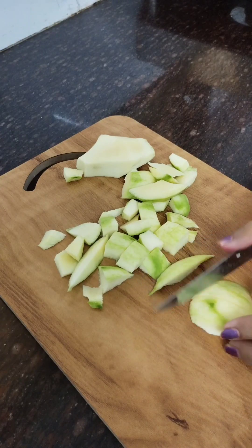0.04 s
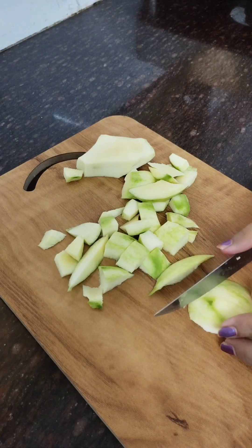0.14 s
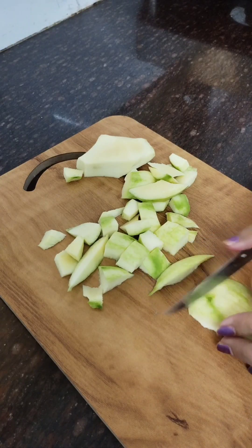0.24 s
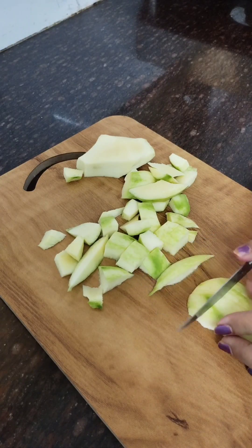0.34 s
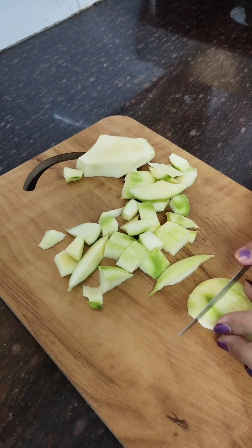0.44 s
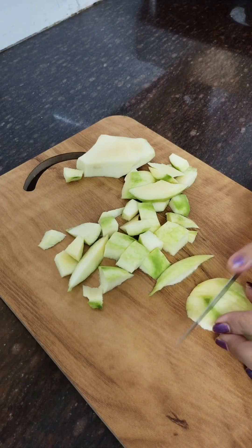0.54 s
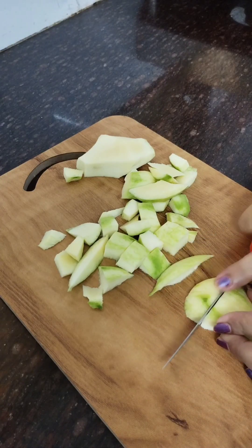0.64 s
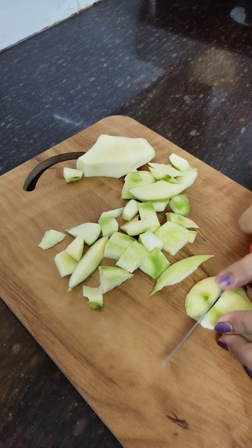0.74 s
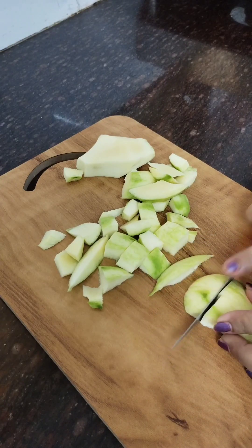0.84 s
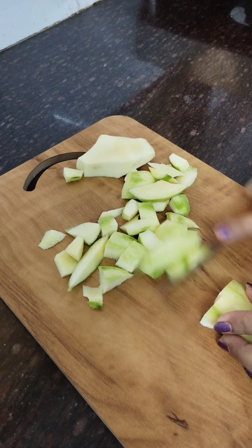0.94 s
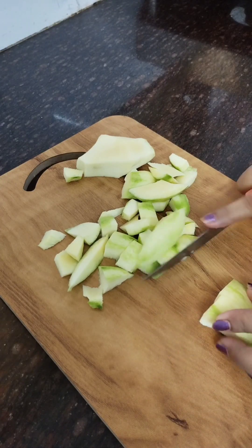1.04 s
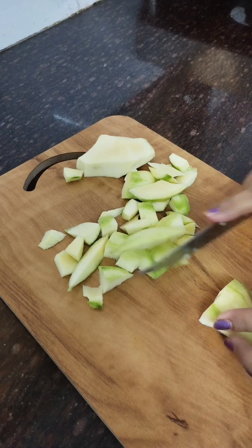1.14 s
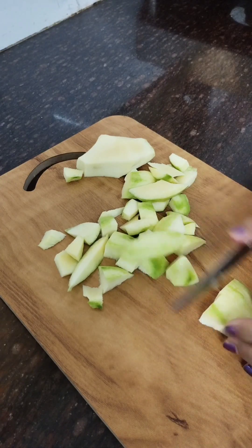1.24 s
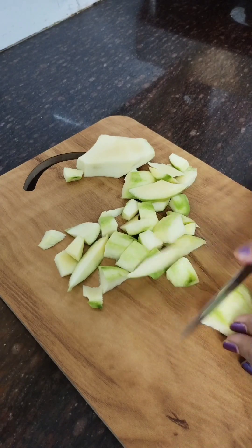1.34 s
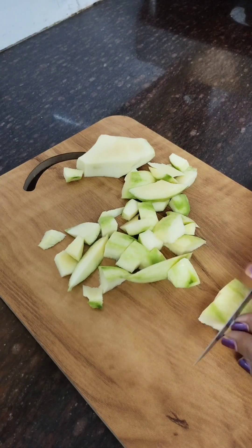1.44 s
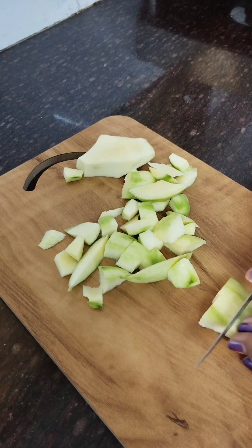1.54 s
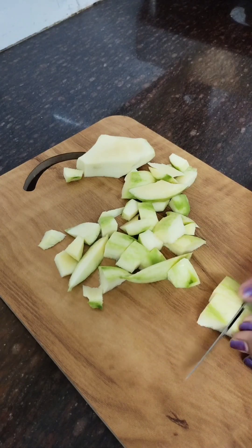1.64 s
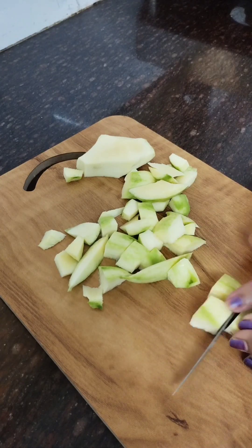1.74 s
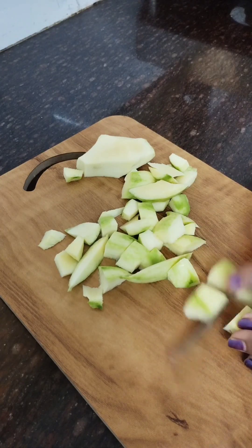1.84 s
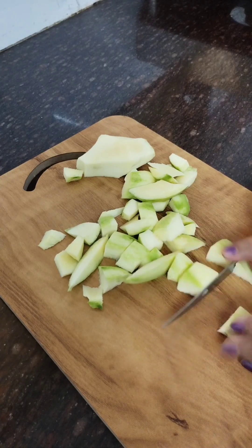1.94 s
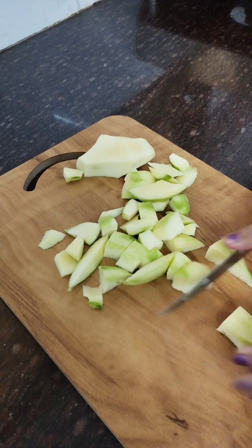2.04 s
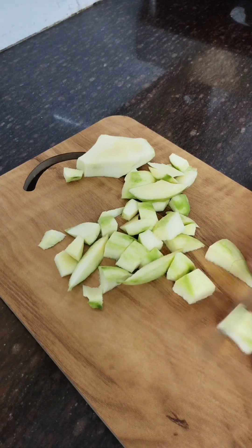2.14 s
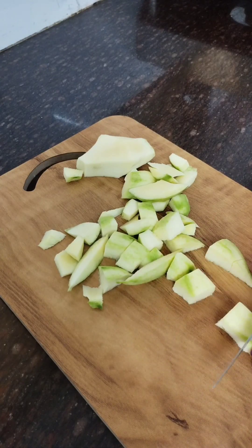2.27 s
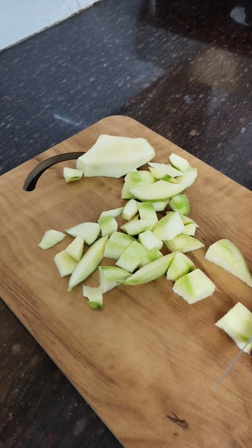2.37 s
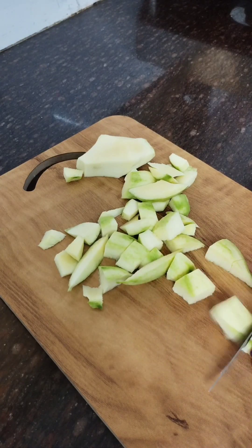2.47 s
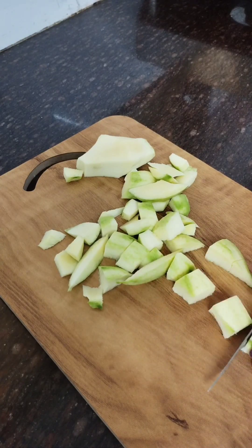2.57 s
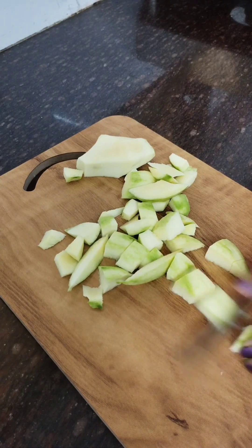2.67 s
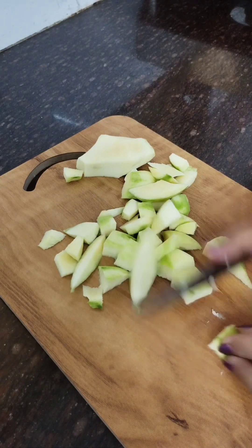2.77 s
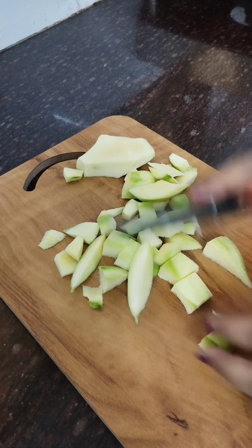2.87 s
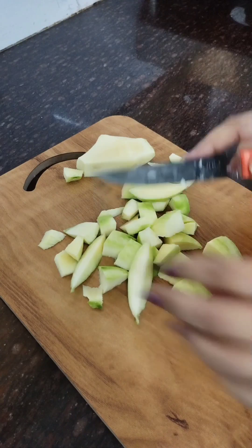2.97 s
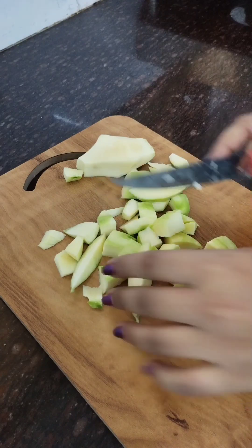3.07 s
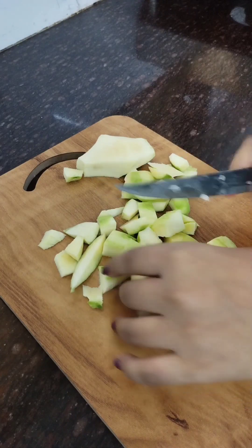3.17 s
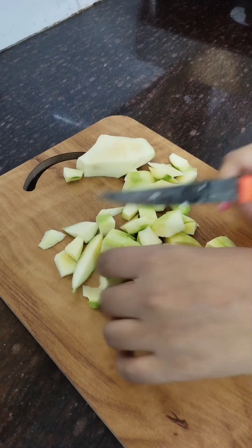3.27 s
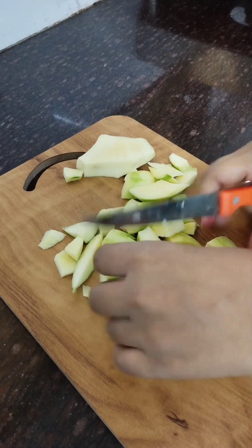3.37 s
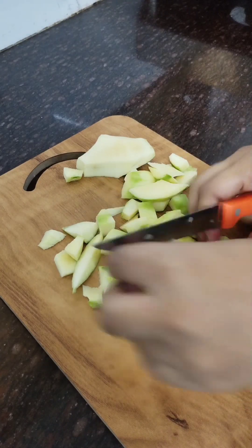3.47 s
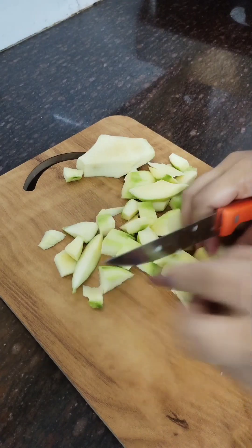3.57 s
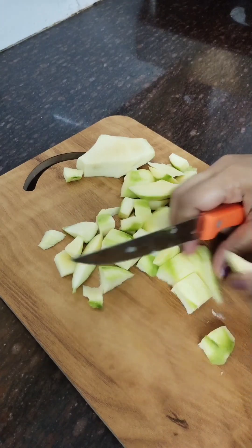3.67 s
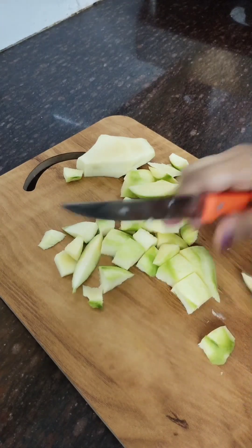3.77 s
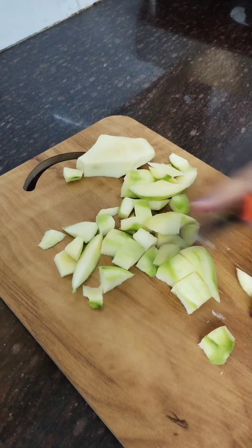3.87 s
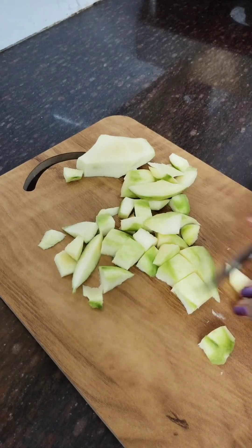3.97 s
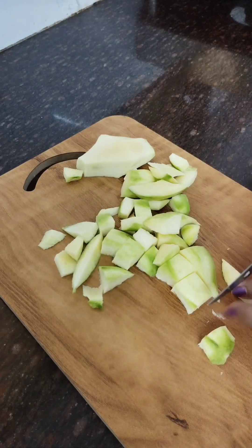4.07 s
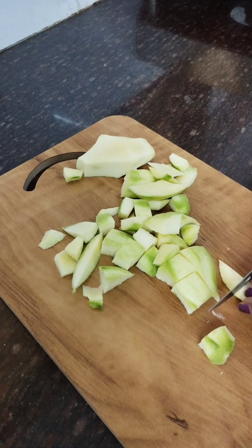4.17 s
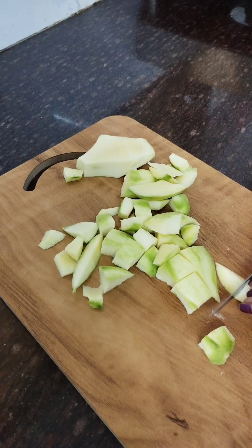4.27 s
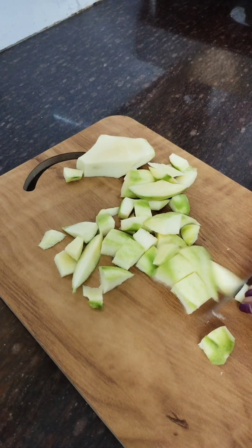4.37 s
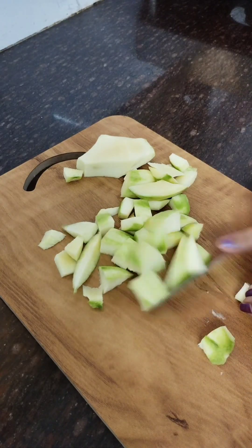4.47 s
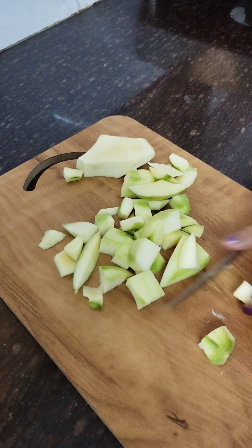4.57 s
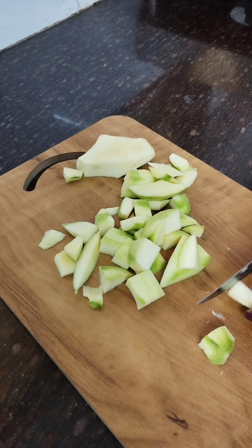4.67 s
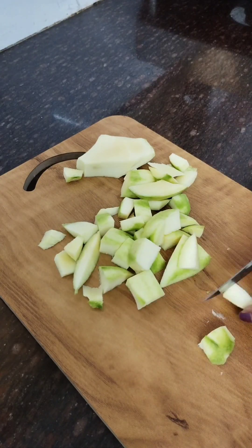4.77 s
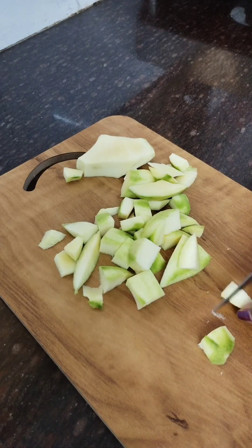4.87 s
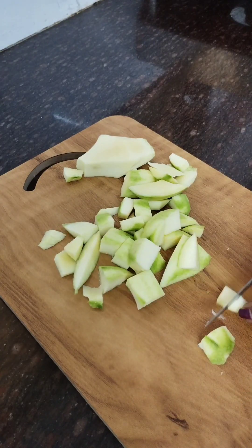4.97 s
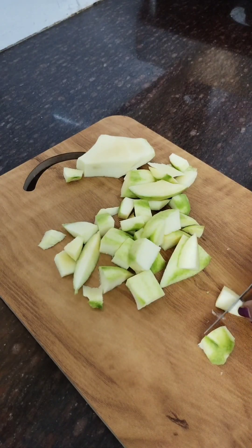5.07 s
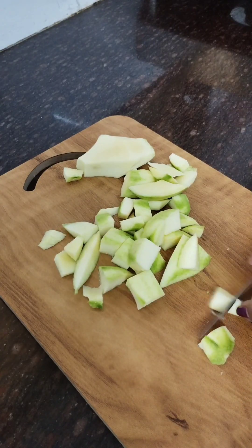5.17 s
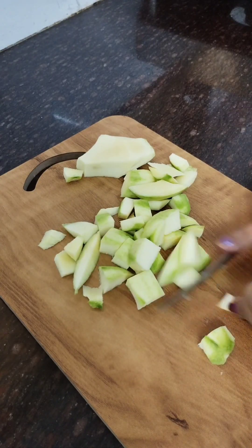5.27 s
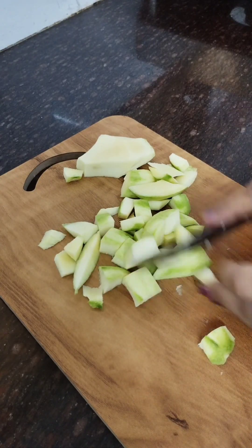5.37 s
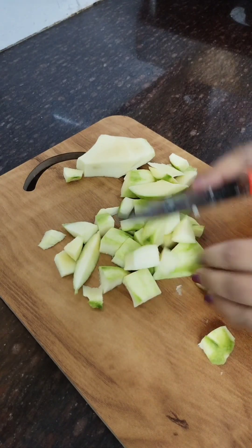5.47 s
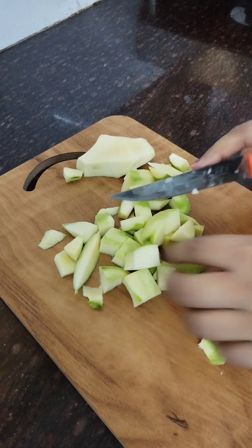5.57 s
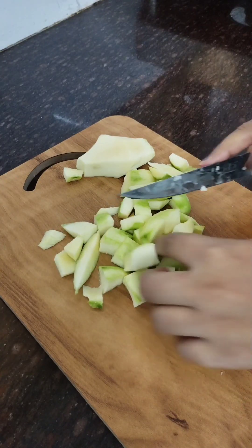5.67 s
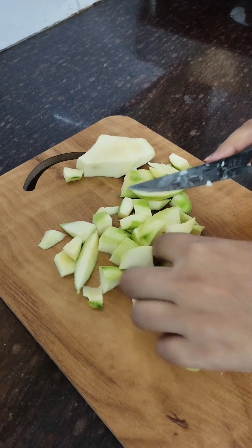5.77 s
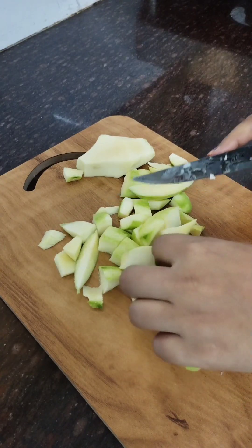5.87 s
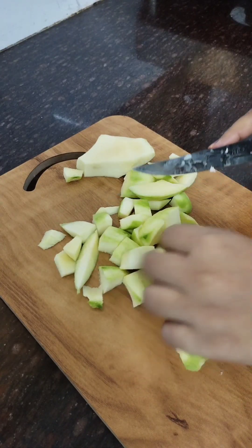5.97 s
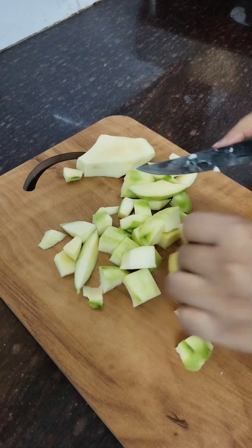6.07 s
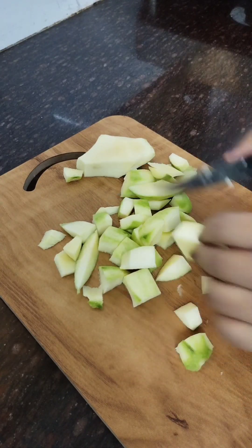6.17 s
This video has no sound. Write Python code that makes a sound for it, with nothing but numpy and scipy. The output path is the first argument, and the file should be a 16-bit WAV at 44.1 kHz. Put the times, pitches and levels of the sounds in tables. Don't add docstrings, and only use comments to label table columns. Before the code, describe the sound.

Close to a small microphone in a hard, lively kitchen, a knife cuts crisp fruit on a wooden board. A crackly slice ends in a light knock, then a short scrape; two much harder, overloaded knocks follow, each with a dragging blade. Later come wet snaps, low bumps, gritty scraping and one light ringing knock. Hands rustle softly; a vehicle and bird are faint at the start.

```python
import sys
import numpy as np
from scipy import signal
from scipy.fft import rfft, irfft, next_fast_len
from scipy.io import wavfile
from scipy.ndimage import uniform_filter1d

SR = 44100
rng = np.random.default_rng(int(sys.argv[2]) if len(sys.argv) > 2 else 0)


def volts(x):
    e = np.asarray(x, float) / 20
    return 10 ** e


def transcribe(u):
    v = np.clip(np.atleast_2d(u).T, -1, 1)
    q = np.round(v * 32767).astype(np.int16)
    wavfile.write(sys.argv[1], SR, q)


N = 274280


def rms_one(x):
    return x / np.sqrt(np.mean(x ** 2) + 1e-20)


def white():
    return rng.standard_normal(N)


def band_pass(x, low_hz, high_hz):
    return signal.sosfilt(signal.butter(2, [low_hz, high_hz], "band", fs=SR, output="sos"), x)


def line(start_s, length_s, first, last):
    return np.interp(np.arange(N) / SR, [start_s, start_s + length_s], [first, last])


def while_on(start_s, end_s):
    t = np.arange(N) / SR
    return uniform_filter1d(1. * (t > start_s) * (t < end_s), size=133)


def at_hz(points, hz):
    points_hz, values = np.transpose(points)
    return np.interp(np.log(hz + 1), np.log(points_hz), values)


def coloured(x, spectrum):
    size = next_fast_len(N)
    gain = volts(at_hz(spectrum, np.fft.rfftfreq(size, 1 / SR)))
    return rms_one(irfft(rfft(x, size) * gain, size)[:N])


def drift(rate_hz):
    r = np.exp(-2 * np.pi * rate_hz / SR)
    wander = signal.lfilter([1], [1, -2 * r, r * r], rng.standard_normal(N + SR))
    return rms_one(wander[SR:])


def grains(per_s, spread_db):
    sizes = volts(spread_db * np.minimum(rng.exponential(1, N), 5)) * rng.choice([-1, 1], N)
    return rms_one(sizes * (rng.random(N) < per_s / SR))


def resonate(x, hz, width_hz):
    r = np.exp(-np.pi * width_hz / SR)
    poles = [1, -2 * r * np.cos(2 * np.pi * hz / SR), r * r]
    return signal.lfilter([(1 - r * r) / 2, 0, (r * r - 1) / 2], poles, x + 1e-18)


def modes(table, drive):
    return sum((-1) ** k * volts(db) * resonate(drive, hz, width_hz)
               for k, (hz, width_hz, db) in enumerate(table))


def bursts(rows, length_s, click):
    low, high, t = np.zeros(N), np.zeros(N), np.arange(2000) / SR
    for s, db, bright_db in rows:
        chatter = rng.standard_normal(len(t)) * np.exp(-(t / length_s) ** 2)
        chatter[0] = -click
        i = round(s * SR)
        low[i:i + len(t)] += volts(db - bright_db) * chatter
        high[i:i + len(t)] += volts(db + bright_db) * chatter
    return np.array([low, high])


def swell(s, db, rise_s, hold_s, fall_s):
    t = np.arange(0, N + 44, 44) / SR
    down = np.maximum((s - t) / rise_s, (t - s - hold_s) / fall_s).clip(0)
    return np.interp(np.arange(N) / SR, t, volts(db - 40 * down))


def moves(rows, rest_db):
    return volts(rest_db) + sum(swell(s, db, fade_s, 0, fade_s) for s, db, fade_s in rows)


# (time [s], blow [dB], microphone sag [0-3], edge snap [dB], blade ring [dB])
KNOCKS = [
    (0.6347, 19, 0.038, 16.5, -12),
    (1.666, 28, 1.46, 20, 9.5),
    (2.5166, 29.5, 1.3, 24, 9),
    (5.144, 18.5, 0.015, 12, 30),
]
# (frequency [Hz], width [Hz], level [dB])
BLADE_LOW = [(813, 160, -13), (1353, 120, -0.5), (2130, 600, -2), (2544, 396, 2)]
BLADE_HIGH = [(3150, 340, -4), (4280, 200, -9.5), (5250, 380, -7.5), (6480, 1200, -15), (8320, 810, -10),
              (10730, 260, -22.5), (14000, 3000, -37)]


def knocks():
    snap, steel = np.zeros(N), np.zeros(N)
    for s, *_, snap_db, blade_db in KNOCKS:
        snap[round(s * SR)] = -volts(snap_db)
        steel[round(s * SR)] = -volts(blade_db)
    blade = modes(BLADE_LOW[2:], steel) + modes(BLADE_HIGH, steel)
    bright_db = 1
    rows = [(s, db, bright_db) for s, db, *_ in KNOCKS]
    hit = board(*bursts(rows, 2e-5, click=0.89))
    blow = hit + resonate(snap, 6200, 4800) - blade
    rattle = volts(-20) * board(*bursts(rows, 0.0031, click=0))
    return blow, rattle


# (frequency [Hz], width [Hz], level [dB])
BOARD_LOW = [(833, 200, -23.5), (1246, 270, 0.5), (2030, 510, 1), (2422, 250, 7.5), (3580, 1500, 1.5)]
BOARD_HIGH = [(4440, 1200, 4), (5520, 900, -3), (6210, 910, 2.5), (8500, 900, -7), (10250, 2200, -17.5),
              (14520, 2900, -37)]


def board(low_drive, high_drive):
    out = modes(BOARD_LOW, low_drive) - modes(BOARD_HIGH, high_drive)
    out = out - 0.39 * resonate(out, 980, 380)
    return out - 0.71 * resonate(out, 2950, 630)


# (full pressure [s], level [dB], rise [s], hold [s], brightness [dB])
SCRAPES = [(.926, -20, 0.02, 0.06, 0.5), (.99, -30.5, 0.076, 0.048, -5), (4.44, -36.5, 0.059, .02, -6),
           (4.475, -20, 0.087, 0.011, 2), (4.506, -16.5, 0.051, 0.0052, 2), (4.56, -41.5, 0.06, .02, -2),
           (4.6, -33.5, 0.067, 0.014, 0), (5.253, -21.5, 0.046, 0.002, 3.5), (5.28, -22, 0.082, 0.016, -2),
           (5.33, -33.5, .05, 0.016, -1.5)]
DRAGS = [(1.792, -28, 0.011, .025, -4), (1.875, -34, 0.097, 0.008, -2), (1.925, -30.5, 0.11, 0.022, -8),
         (2.655, -27.5, .01, 0.021, -1.5), (2.72, -26, 0.052, 0.0194, -2.5),
         (2.79, -36.5, 0.033, 0.0088, -6)]


def scrapes():
    stutter = volts(1.8 * drift(110))
    clicks = stutter * np.array([grains(9000, 3.7), grains(9000, 2.5)])
    push = pressure(SCRAPES)
    low, high = push * clicks
    hiss = volts(-33) * resonate(push[1] * clicks[0], 12000, 5000)
    edge = modes(BLADE_LOW, low) + modes(BLADE_HIGH, high) + hiss
    dull = signal.butter(1, 9000, fs=SR, output="sos")
    drag = signal.sosfilt(dull, board(*(pressure(DRAGS) * clicks)))
    return volts(9.5) * edge + volts(5) * drag


def pressure(rows):
    fall_s = 0.074
    return sum(volts([[-bright_db], [bright_db]]) * swell(s, db, rise_s, hold_s, fall_s)
               for s, db, rise_s, hold_s, bright_db in rows)


# (time [s], peak [dB], brightness [dB])
CRACKS = [(0.3436, -37, 4.5), (0.53, -33, 4), (0.546, -36, 0), (0.5915, -20.5, 2), (0.6047, -18, -1),
          (0.617, -15, 2), (1.6345, -25.5, 1.5), (2.4723, -25.5, 1), (2.8744, -36, 4), (3.235, -38, 0),
          (3.336, -45.5, 5), (3.6274, -39, 2.5), (4.086, -38.5, 3.5), (4.1975, -50.5, 19),
          (4.3132, -21.5, 3), (4.3444, -37, -1), (5.0664, -27.5, 3.5), (5.1015, -26, 2.5),
          (5.854, -47.5, 2.5), (5.8994, -47, 6.5)]
TICKS = [(0.361, -34.5, 5), (0.411, -39, 4), (0.5925, -14, 1), (0.6095, -22, 0), (0.6218, -20, -1),
         (0.883, -36.5, 13), (0.8995, -34.5, 13), (2.057, -37, 2), (2.1393, -42.5, 0.5), (2.1897, -40, 2.5),
         (3.703, -44, 8), (3.8018, -35.5, 3), (4.3799, -21.5, 2.5), (4.4116, -18, 0.5), (4.4205, -23, 4),
         (4.432, -23, -4.5), (4.476, -15, -10), (4.485, -11.5, -12), (5.2525, -17, -5), (5.872, -46, 2.0)]
# (frequency [Hz], width [Hz], level [dB])
SNAP = [(1250, 1400, -0.5), (3200, 2500, -0.5), (5650, 6700, -5), (9400, 3500, -2.5), (13300, 6100, -13.5)]


def cracks():
    low, high = bursts(CRACKS, 0.013, click=2.8) + bursts(TICKS, 0.0041, click=2.8)
    return volts(-4) * (modes(SNAP[:2], low) + modes(SNAP[2:], high))


# (start [s], length [s], start level [dB], change [dB])
SLICES = [(0.592, 0.034, -29.5, 4), (1.635, .025, -23.5, -7), (1.66, .0045, -31, 12.5),
          (2.47, .031, -35.5, -29), (2.511, 0.0092, -29.5, 24), (4.261, .04, -53.5, 1.5),
          (4.34, 0.094, -56.5, 2), (5.137, 0.0082, -55.5, 42.5)]
# (frequency [Hz], density [dB])
FLESH = [(290, -43), (500, -8.5), (1330, -3.5), (2260, -12), (2810, -13.5), (7060, -6), (8790, -3.5),
         (15300, -28.5), (16500, -39)]


def slices():
    level = sum(volts(line(s, length_s, db, db + change_db)) * while_on(s, s + length_s)
                for s, length_s, db, change_db in SLICES)
    return level * coloured(grains(11000, 2.1) * volts(1.7 * drift(90)), FLESH)


# (time [s], level [dB])
TAPS = [(2.473, -10.5), (5.104, -14), (6.073, -18.5)]


def taps():
    clicks = np.zeros(N)
    for s, db in TAPS:
        clicks[round(s * SR)] = volts(db + 21.5)
    return resonate(resonate(clicks, 1270, 160), 1270, 500)


# (frequency [Hz], T60 [s])
KITCHEN_T60 = [(500, 0.15), (1300, 0.75), (2500, 0.51), (5000, 0.45), (10000, .4), (16000, 0.065)]


def kitchen(x):
    t, tail = np.arange(SR) / SR, 0
    edges_hz = 400 * 2 ** np.arange(0, 5.6, .5)
    for low_hz, high_hz in zip(edges_hz, edges_hz[1:]):
        band = band_pass(rng.standard_normal(SR), low_hz, high_hz)
        tail = tail + band * volts(-60 * t / at_hz(KITCHEN_T60, np.sqrt(low_hz * high_hz)))
    tail *= np.clip(t / 0.0048, 0, 1)
    tail_db, echo_s, echo_db = 0.5, .0112, 9
    echo = np.roll(resonate(resonate(x, 2250, 570), 2600, 1100), round(echo_s * SR))
    echo = 0.85 * echo + 0.28 * np.roll(echo, round(.0017 * SR))
    reverb = signal.fftconvolve(x, tail / np.linalg.norm(tail))[:N]
    return volts(tail_db) * reverb + volts(echo_db) * echo


# (time [s], peak [dB])
THUMPS = [(3.944, -32.5), (3.961, -21.5), (3.977, -25.5), (4.017, -21), (4.042, -27.5), (4.079, -36),
          (4.609, -44)]


def thumps():
    out, t = np.zeros(N), np.arange(3000) / SR
    swing = np.sin(2 * np.pi * 71 * t) * (t / 0.0046) * np.exp(-t / 0.0034)
    for k, (s, db) in enumerate(THUMPS):
        i = round(s * SR)
        out[i:i + len(t)] += (-1) ** k * volts(db + 16) * swing
    return out


# (time [s], level [dB], fade [s], share of the deep part [0-1])
PUFFS = [(.18, -42.5, .6, 0.44), (.33, -47, 0.56, 0.1), (.614, -39.5, 0.18, 0), (.752, -65, .2, 0),
         (1.0, -46, 0.98, 0), (1.169, -54.5, 0.37, 0), (2.072, -45.5, .3, 0.6), (2.18, -40.5, .5, 1),
         (2.379, -47, 0.51, 1), (2.99, -53, .4, .5), (3.27, -42, .6, 0.67), (3.468, -50, .2, .7),
         (3.9, -42.5, .2, 0.57), (4.179, -54, 0.12, 0.34), (4.36, -43, 0.35, .6), (4.62, -37, 0.21, 0.94),
         (4.76, -58, 0.17, 0.6), (5.3, -48.5, .4, 0), (5.7, -57, 0.64, 0.3), (5.94, -52, 0.28, 0.54),
         (6.15, -58.5, 0.34, 0.8)]


def puffs():
    deep = rms_one(band_pass(white(), 20, 60))
    higher = rms_one(band_pass(white(), 55, 160))
    out = volts(-66.5) * (deep + higher)
    for s, db, fade_s, share in PUFFS:
        out = out + swell(s, db, fade_s, 0, fade_s) * (share * deep + (1 - share) * higher)
    return out


# (frequency [Hz], level [dB])
BLADE_RING = [(2860, -73), (3060, -72), (3774, -72), (4011, -74), (4247, -68), (4538, -70), (5265, -73),
              (7262, -76)]


def blade_ring():
    level_db = np.interp(np.arange(N) / SR, [3.12, 3.2, 3.3, 3.38], [-8, 0, 0, -10])
    rings = sum(volts(db) * rms_one(resonate(white(), hz, 6.7)) for hz, db in BLADE_RING)
    return volts(level_db) * while_on(3.12, 3.38) * rings


# (time [s], level [dB], fade [s])
RUSTLE = [(.065, -58, 0.15), (.13, -63, 0.1), (.205, -69, 0.084), (.26, -58, 0.11), (.346, -63, 0.23),
          (.49, -75, .3), (.53, -57.5, 0.44), (1.42, -63, 0.27), (1.485, -71, 0.086), (2.15, -59, 0.29),
          (2.35, -63.5, 0.2), (3.02, -62, 0.49), (3.19, -61, 0.22), (3.245, -56.5, 0.199), (3.33, -67, .3),
          (3.62, -57.5, 0.63), (3.802, -59, .15), (4.09, -56, 0.37), (4.2, -74, 0.14),
          (4.972, -56.5, 0.094), (5.06, -62.5, .2), (5.56, -69, 0.3), (5.69, -68, .3), (5.86, -63, 0.33),
          (6.136, -64.5, .25)]
# (frequency [Hz], density [dB])
HANDS = [(1760, -40), (3000, -1), (3390, -5), (9940, -8), (15500, -32), (16100, -21), (16500, -57)]


def rustle():
    rub = coloured(grains(9000, 3) * volts(2.7 * drift(30)), HANDS)
    hands = moves(RUSTLE, -80.5) * rub
    return volts(-3) * hands + volts(-5) * resonate(hands, 9200, 2500)


# (time [s], level [dB], fade [s])
REVS = [(.076, -48, 0.44), (.34, -44.5, 0.6)]


def engine():
    hz, db, on = np.full(N, 107.3), 20 * np.log10(moves(REVS, -54.5)), while_on(0, .48)
    return on * (tone(hz, db) + tone(2 * hz, db - 10.5) + tone(4 * hz, db - 17))


def tone(hz, db):
    return np.sqrt(2) * volts(db) * np.sin(2 * np.pi * np.cumsum(hz) / SR)


# (start [s], length [s], pitch [Hz], glide [Hz/s], level [dB])
BIRD = [
    (.06, .22, 3078, -30, -62),
    (.335, .2, 4090, -2500, -57.5),
]
BIRD_FADE_DB = [-4, -3]
BIRD_WAVER = [.005, .014]
# (pitch ratio, level [dB])
BIRD_TRILL = [
    [(1, 2), (.89, -8), (.93, -8), (1.015, -3), (1.07, -7)],
    [(1, 0), (1.07, -7)],
]


def bird():
    out, waver = 0, drift(200)
    for call, fade_db, spread, notes in zip(BIRD, BIRD_FADE_DB, BIRD_WAVER, BIRD_TRILL):
        s, length_s, start_hz, glide, start_db = call
        hz = line(s, length_s, start_hz, start_hz + glide * length_s) * (1 + spread * waver)
        db = line(s, length_s, start_db, start_db + fade_db)
        whistle = sum(tone(ratio * hz, db + note_db - 6) for ratio, note_db in notes)
        out = out + while_on(s, s + length_s) * whistle
    return out


# (frequency [Hz], density [dB])
AIR = [(12, -28), (20, -1.5), (51, -9), (79, -16.5), (135, -5.5), (169, -5.5), (305, -18.5), (492, -17.5),
       (652, -19.5), (729, -15.5), (2060, -23.5), (3140, -36), (8890, -40.5), (15200, -42), (16500, -59.5)]
# (frequency [Hz], width [Hz], level [dB])
HUMS = [(241.6, 4.1, -58), (390, 100, -53.5), (188, 24, -54.5)]


def background():
    air = volts(-48.5 + .8 * drift(4)) * coloured(white(), AIR)
    hums = sum(volts(db) * rms_one(resonate(white(), hz, width_hz)) for hz, width_hz, db in HUMS)
    port = volts(-68.5) * rms_one(resonate(white(), 8500, 900))
    return air + hums + port


def scene():
    blow, rattle = knocks()
    scrape, fruit, far_bird = scrapes(), cracks() + slices() + taps(), bird()
    room = kitchen(blow + volts(-7.5) * scrape + volts(-8.5) * fruit + volts(3) * far_bird)
    near = blow + rattle + scrape + fruit
    at_microphone = thumps() + puffs()
    faint = blade_ring() + rustle() + engine() + far_bird + background()
    return (near + room + at_microphone + faint)[None]


def sag():
    kicks = np.zeros(N)
    for s, _, size, *_ in KNOCKS:
        kicks[round(s * SR)] = -.65 * size
    loss = signal.lfilter([1], [1, -np.exp(-1 / (0.032 * SR))], kicks)
    return signal.sosfilt(signal.butter(2, 1.1, "high", fs=SR, output="sos"), loss)


# (held level [dB], hold [s], first step [dB], level one block later [dB])
DUCKS = [(-10.5, .0945, 0, 0.5), (-9.5, .0995, -1, 2.5), (-11, .1105, 1.5, 2.5), (-10.5, 0.099, -0.5, -1.5)]


def gain_control():
    rest_db, settle_s, block_s, attack_s = -3.5, .3, .023, .0012
    db, t = np.full(N, rest_db), np.arange(N) / SR
    for (s, *_), (held_db, hold_s, first_db, second_db) in zip(KNOCKS, DUCKS):
        free_s = t - s - hold_s - block_s
        settling_db = rest_db + (second_db - rest_db) * np.exp(-free_s.clip(0) / settle_s)
        after_db = np.where(free_s < 0, first_db, settling_db)
        ducked_db = np.where(t < s + hold_s, held_db, after_db)
        db = np.where(t < s + attack_s, db, ducked_db)
    return volts(uniform_filter1d(db, size=133))


def band_limit(x):
    return signal.sosfilt(signal.butter(12, 16640, fs=SR, output="sos"), x)


def record(dry):
    x = np.clip((dry + sag()) * gain_control(), -1, 1)
    top_cut = signal.ellip(8, .5, 35, 15800, fs=SR, output="sos")
    x = np.clip(signal.sosfilt(top_cut, x), -1, 1)
    return band_limit(x)


dry = scene()
out = record(dry)
transcribe(out)
```